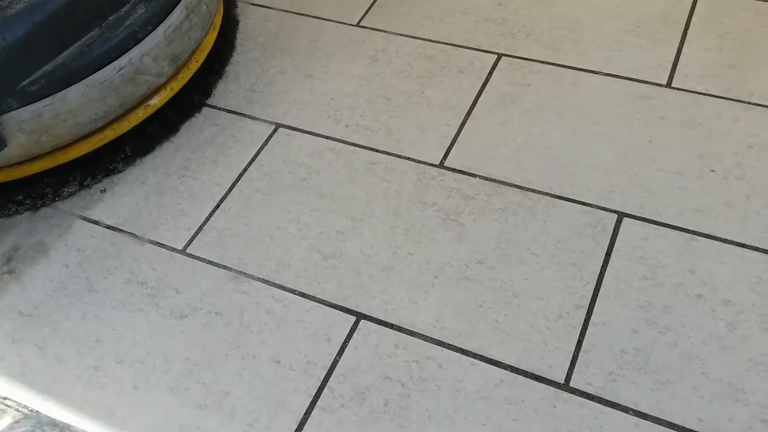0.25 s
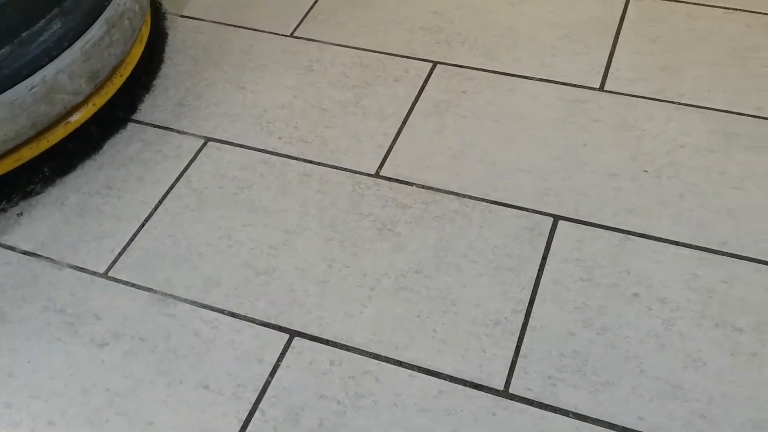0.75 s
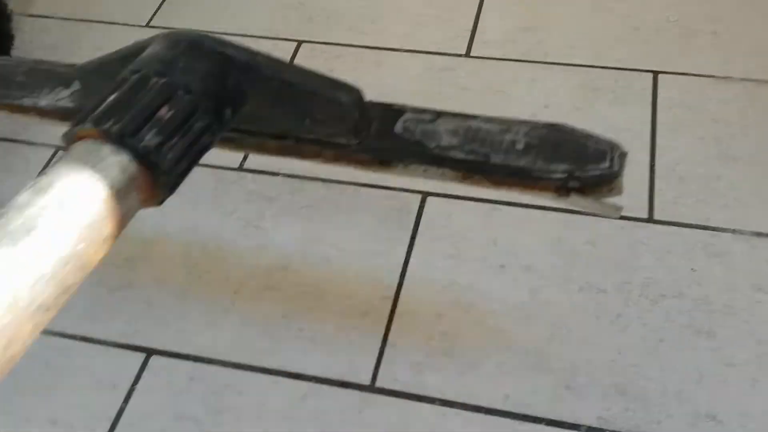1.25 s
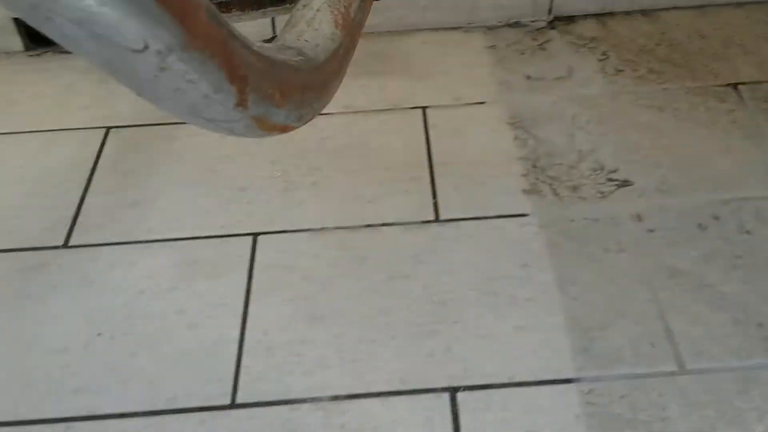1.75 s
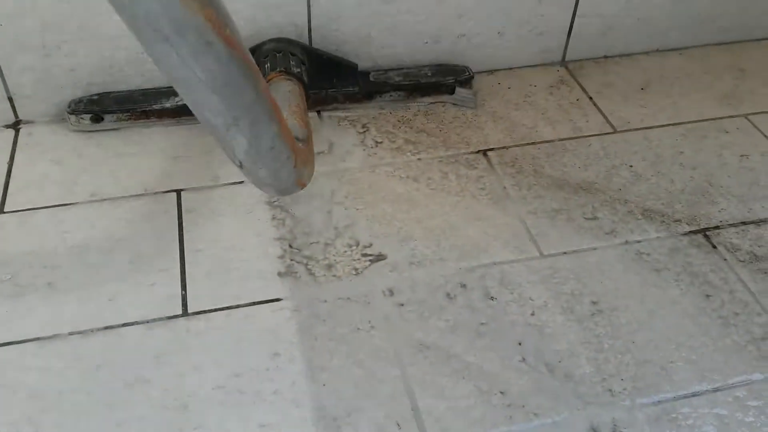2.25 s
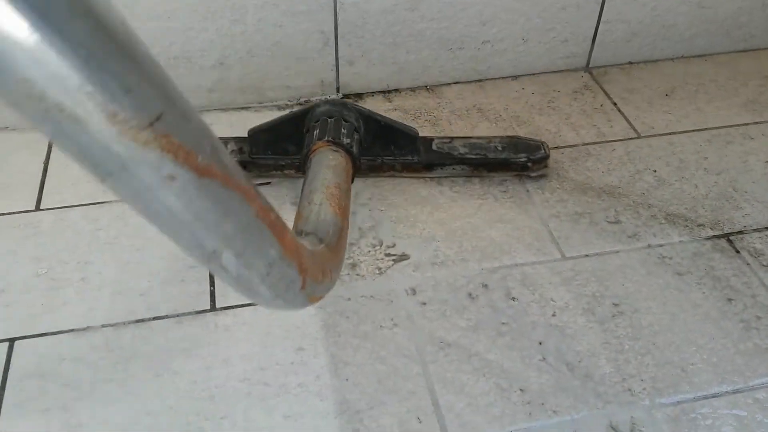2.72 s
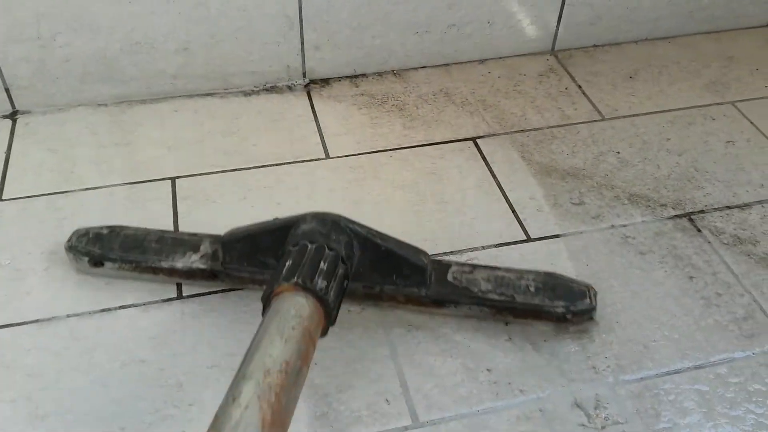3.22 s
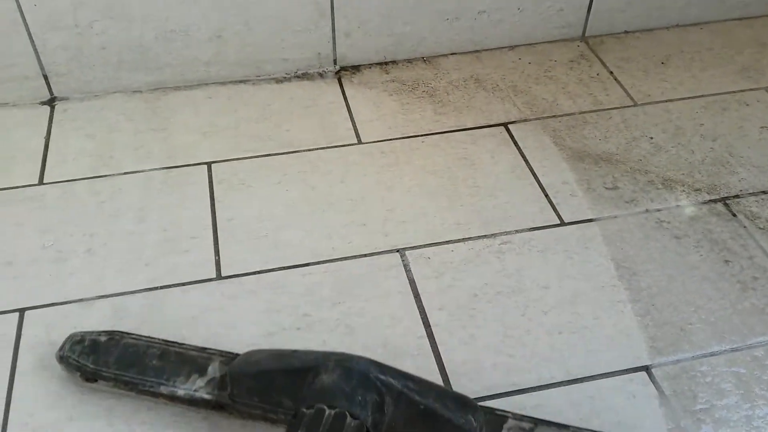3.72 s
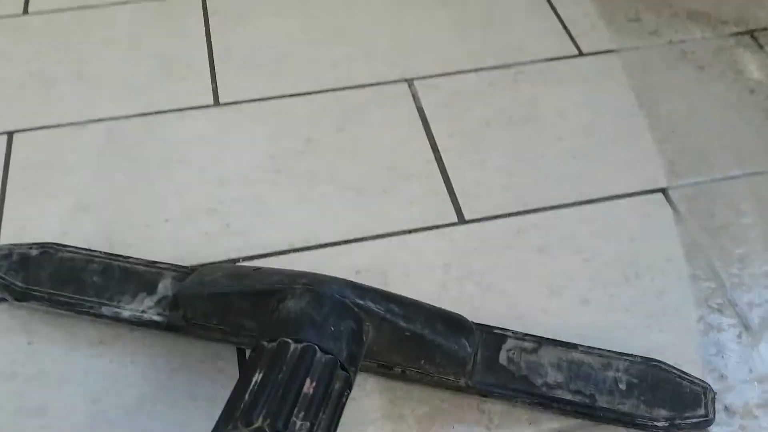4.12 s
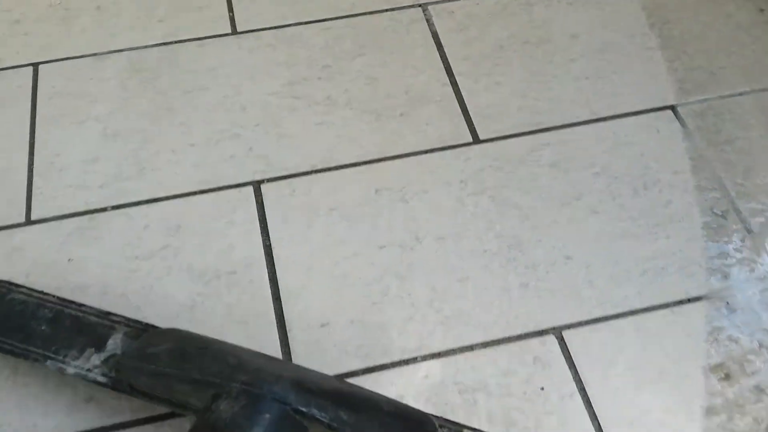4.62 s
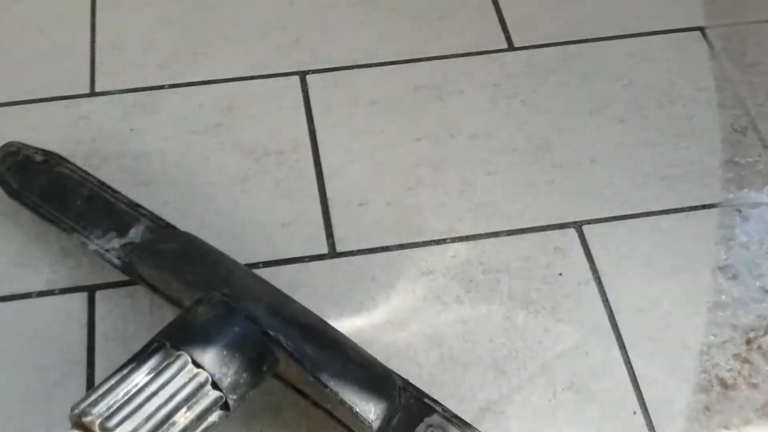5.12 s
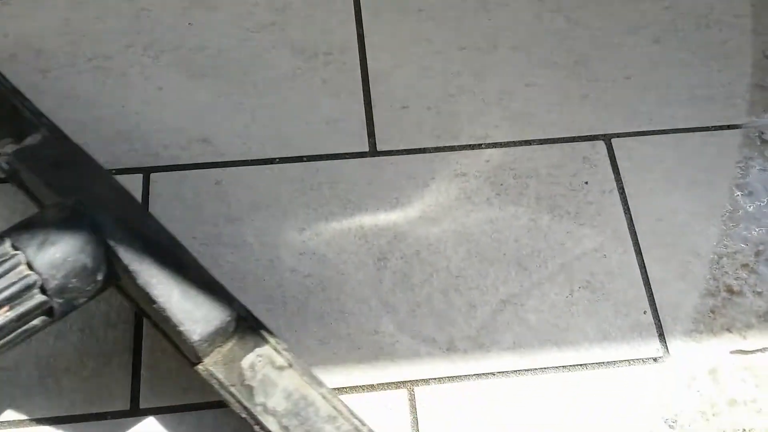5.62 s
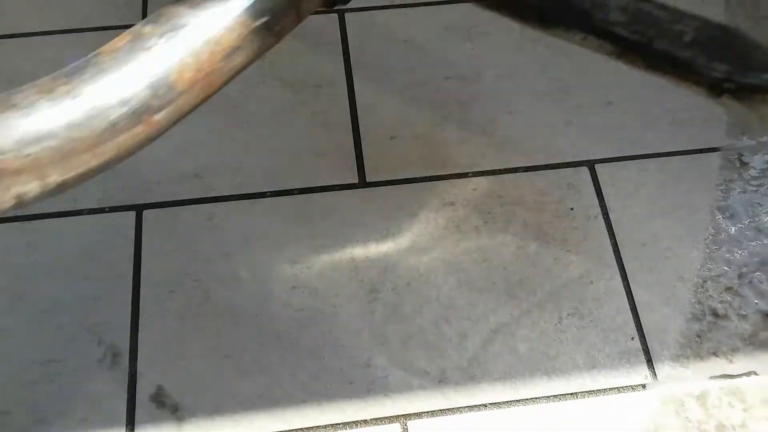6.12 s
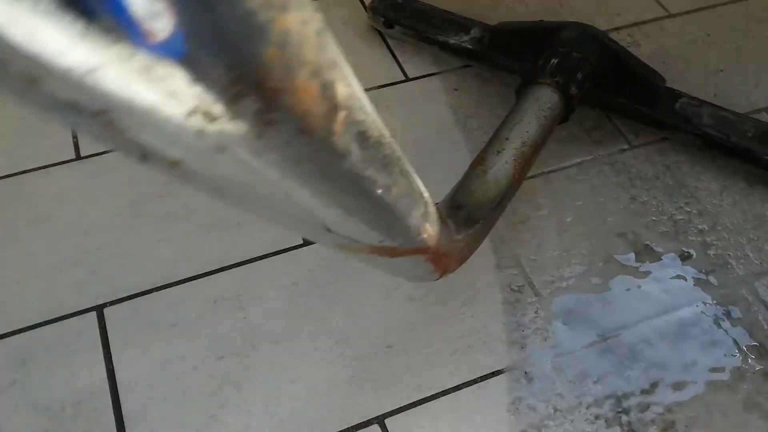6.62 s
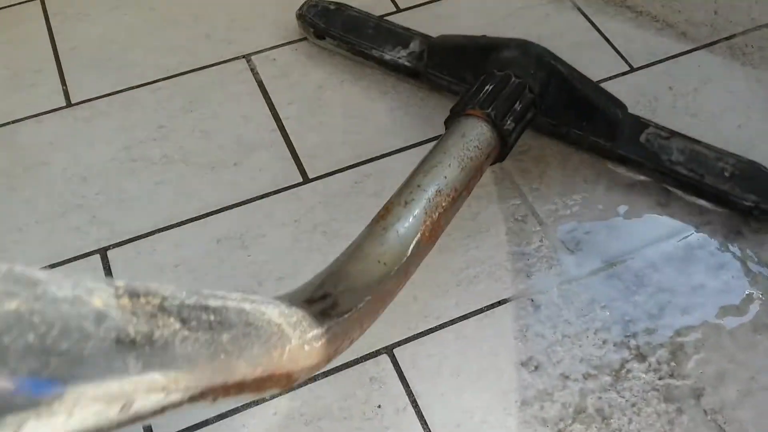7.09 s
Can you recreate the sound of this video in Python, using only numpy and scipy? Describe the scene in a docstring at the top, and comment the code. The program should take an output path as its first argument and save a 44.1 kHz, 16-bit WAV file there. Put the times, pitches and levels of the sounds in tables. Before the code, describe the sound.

A wet vacuum runs throughout in a tiled room, heard in stereo from a phone close to the wand. Its motor is a smooth, almost pure hum near 319 Hz with faint, wavering overtones, over hose roar, exhaust rush and slight low rumble. At the start there is a small puff, then bright suction hiss from the rubber lips, fading by 1 s as the nozzle lifts; the hum sags very slightly in pitch. A sharp tick at 1.9 s, a clack at 2.1 and a heavier hollow thump at 2.24 set the nozzle down, and hiss swells to 2.8 s. It continues with shifting brightness while the hum weakens sharply around 4 s, then gradually recovers. From 5.7 to 6 s the hiss falls away, leaving roar. Rapid clacks at 6.6 s and another knock at 6.7 bring the hiss back, continuing to the end at 7.35 s.

```python
"""The motor of a wet vacuum cleaner hums in a tiled room, heard by a phone held beside the wand.
The hum is a sine at the shaft speed, with quieter sines at multiples of it.
The squeegee nozzle knocks on the tiles, and hisses when its rubber lips seal on them.
Air roars in hose and exhaust over a low rumble: these and the hiss are noise built in narrow bands."""
import sys
import numpy as np
from scipy import signal
from scipy.fft import rfft, irfft, next_fast_len
from scipy.io import wavfile
from scipy.ndimage import uniform_filter1d

SR = 44100
rng = np.random.default_rng(int(sys.argv[2]) if len(sys.argv) > 2 else 0)


def store_wav(level_fs):
    """Save 16-bit WAV to argv[1]."""
    pcm = np.round(np.clip(np.atleast_2d(level_fs), -1, 1) * 32767)
    wavfile.write(sys.argv[1], SR, pcm.T.astype(np.int16))


N = 324135
T = np.arange(N) / SR  # time of each sample in seconds
SIZE = next_fast_len(N)
LOG_HZ = np.log2(np.arange(1, SIZE // 2 + 2) * SR / SIZE)  # pitch axis in octaves, for the spectra
SIDE = np.array([[1], [-1]])  # left, right

# Shaft speed; it sags while the nozzle is off the tiles and air flows freely.
# Each row: start in seconds, turns per second in Hz.
SHAFT_SPEED = [(0.0, 319.8), (1.0, 318.6), (1.8, 317.1), (2.3, 317.1), (2.9, 318.7), (3.7, 319.0),
               (4.4, 319.6), (5.3, 319.0), (5.9, 318.0), (6.55, 316.6), (7.35, 318.4)]


def motor():
    """The spinning shaft sounds once per turn and, more quietly, several times per turn."""
    speed_hz, = curves(SHAFT_SPEED)
    turn = 2 * np.pi * np.cumsum(speed_hz) / SR
    return np.sqrt(2) * (shaft_tone(turn) + overtones(turn))  # a sine's peak is root 2 times its rms


# Shaft tone as the phone moves through the room's standing waves.
# Each row: start in seconds, level in dB.
HUM_LEVEL = [(0.0, -15), (0.7, -12), (1.15, -12), (1.45, -12), (1.8, -15), (2.3, -15.5), (2.43, -17),
             (2.5, -15), (3.05, -16.5), (3.58, -14.7), (3.68, -15.6), (3.87, -20.3), (4.03, -28.5),
             (4.13, -25), (4.26, -19.5), (4.9, -19), (5.8, -16), (6.15, -17.5), (6.62, -20), (6.75, -22.5),
             (6.85, -18.5), (7.35, -19.5)]
# Which way the phone faces the machine.
# Each row: start in seconds, left minus right level in dB, left lead over right in radians.
PHONE_FACING = [(0.0, -3, .31), (1.3, -2.5, .28), (1.75, .5, .28), (2.2, 3, .15), (2.6, 2.2, .11),
                (3.7, 1.5, 0.094), (4.75, 2.5, .01), (5.95, 1, .07), (6.7, 2, -.14), (7.35, 2, -.2)]
# The hum flips over and drops for a moment: from seconds, to seconds, change in dB.
HUM_HICCUP = (3.606, 3.629, -5.5)


def shaft_tone(turn):
    """One sine per turn, with a level and phase difference between the two microphone ports."""
    level_db, = curves(HUM_LEVEL)
    pan_db, lead_rad = curves(PHONE_FACING)
    start, end, drop_db = HUM_HICCUP
    flip = np.where((T > start) & (T < end), -undb(drop_db), 1.0)
    flip = uniform_filter1d(flip, size=130)  # soften the edges
    gain = flip * undb(level_db + 0.31 * walk(16) + SIDE / 2 * pan_db)
    return gain * np.sin(turn + SIDE / 2 * lead_rad)


# Overtones swell and fade at each port as it moves.
# Each row: start in seconds, then left and right level in dB of the 2nd, the 6th and the 12th.
OVERTONE_LEVELS = [(0.0, -37, -35.5, -45, -45, -52, -50), (0.25, -33.5, -34, -30.5, -38, -46, -45),
                   (0.55, -33, -41, -38, -40, -45, -40), (0.9, -32, -40, -41, -33, -52, -40),
                   (1.25, -39, -38, -39, -29, -47, -36), (1.45, -56, -38, -33, -38, -45, -35),
                   (1.62, -30, -28, -35, -33, -45, -44), (1.9, -26.5, -30, -31, -30, -44, -46),
                   (2.15, -38, -59, -31.5, -38, -49, -42), (2.5, -44, -55, -33, -40, -50, -48),
                   (2.9, -46, -53, -41, -36, -46, -46), (3.35, -38.5, -44, -37, -47, -40, -46),
                   (3.9, -60, -56, -35, -43, -48, -46), (4.25, -52, -42, -42, -42, -52, -38.5),
                   (4.65, -45, -43, -35, -32, -46, -41), (5.15, -37, -34, -45, -40, -42, -45),
                   (5.55, -40, -41, -40, -30, -46, -48), (5.8, -35.5, -39, -36, -30, -49, -46),
                   (6.1, -33, -30, -42, -28.5, -42, -48), (6.45, -32, -46, -29, -28, -47, -42),
                   (6.67, -36, -52, -35, -40, -44, -39), (6.82, -37, -35, -36, -39, -47, -46),
                   (7.35, -39, -38, -42, -44, -44, -42)]
# Which multiples of the shaft speed those three pairs are.
OVERTONE_MULTIPLES = (2, 6, 12)
# Fainter overtones. Each row: multiple of the shaft speed, left level in dB, right level in dB.
FAINT_OVERTONES = [(3, -48, -42), (4, -45.5, -42), (5, -44.5, -41.5)]


def overtones(turn):
    """Sines at multiples of the shaft speed; shorter waves part more between the ports."""
    levels = curves(OVERTONE_LEVELS)
    part_rad = 1.5 * walk(2)  # slow drift of phase between the ports, as the 6th has it
    pairs = [(k, levels[2 * i:2 * i + 2]) for i, k in enumerate(OVERTONE_MULTIPLES)]
    pairs += [(k, faint_db) for k, *faint_db in FAINT_OVERTONES]
    out = np.zeros((2, N))
    for k, pair in pairs:
        short = (k - 2) / 4  # 0 for the 2nd, whose phase does not drift; 1 for the 6th
        for channel, level_db, half in zip(out, pair, (0.5, -0.5)):
            drift = short * (half * part_rad + 0.35 * walk(12))
            gain = undb(level_db + (0.6 + 1.1 * short) * walk(25))
            channel += gain * np.sin(k * turn + drift)
    return out


# Nozzle and wand knocks. Each row: start in seconds, thump level in dB,
# damping of the thump by hand and floor in 1/s, clack level in dB, tick level in dB.
KNOCK_EVENTS = [(1.941, -50, 0, -42, -13), (2.143, -40, 40, -10, -45), (2.239, -8.5, 2, -18, -20),
                (2.261, -15, 5, -33, -30), (6.593, -17, 40, -15, -40), (6.602, -16, 40, -10.5, -30),
                (6.612, -17, 40, -24, -45), (6.709, -22, 40, -20, -20)]
# Ringing of the wand and its air column.
# Each row: pitch in Hz, level in dB, time to fade by 60 dB in seconds before the extra damping.
WAND_MODES = [(60, -10, .12), (84.95, -8, 0.17), (127.3, -10, 0.79), (177, 3, 0.13), (207, -12, 0.09),
              (1110, -10.5, 0.35)]
# Ringing of the plastic nozzle, before each clack's random stretch.
# Each row: pitch in Hz, level in dB, time to fade by 60 dB in seconds.
NOZZLE_MODES = [(414, -1.5, 0.033), (543, -1, 0.056), (795, -0.5, 0.021), (1165, 0, 0.04), (1900, -5, .025),
                (3370, -5, 0.022)]


def knocks():
    """Each blow rings the wand and its air column, clacks the plastic nozzle and ticks on the tile."""
    out = np.zeros((2, N + SR))
    t = np.arange(SR // 2) / SR
    bright = signal.butter(3, 10000, "high", fs=SR, output="sos")
    thump = rings(WAND_MODES, t) * (1 - np.exp(-t / 0.0036))  # rubber lips soften the push
    for start, thump_db, damping, clack_db, tick_db in KNOCK_EVENTS:
        stretch = 1 + 0.094 * rng.standard_normal()  # each clack differs in pitch and decay
        clack = rings(NOZZLE_MODES, t * stretch) * (1 - np.exp(-t / 0.00044))
        burst = rng.standard_normal((2, len(t))) * np.exp(-t / 0.0012)
        tick = signal.sosfilt(bright, burst)
        blow = undb(thump_db) * thump * np.exp(-damping * t)
        blow = blow + undb(clack_db) * clack + undb(tick_db) * tick
        i = int(start * SR)
        out[:, i:i + len(t)] += blow
    return out[:, :N]


def rings(modes, t):
    """Decaying sines struck at time zero; neighbours swing opposite ways."""
    ring = [undb(db) * np.exp(-np.log(1000) * t / t60) * np.sin(2 * np.pi * hz * t) for hz, db, t60 in modes]
    return (sum(ring[::2]) - sum(ring[1::2])) / 2


# Suction through the gap under the rubber lips.
# Each row: start in seconds, hiss level in dB before tilt and puffs,
# left minus right level in dB, which all the air noise takes on in the treble.
LIP_SEAL = [(0.0, -23, 0), (0.16, -26.5, 1.5), (0.3, -25.2, 0), (0.6, -25.8, 0.5), (0.82, -28.5, 0.5),
            (0.95, -32.5, 0), (1.2, -33.4, .2), (2.236, -34.5, .6), (2.244, -29, 1.5), (2.45, -25, -0.5),
            (2.8, -20, -1.7), (3.15, -21.5, -.2), (3.5, -23.5, 0.5), (4.35, -21.8, 0), (5.55, -23, 0.8),
            (5.75, -26, .3), (6.0, -32.3, -0.5), (6.665, -33.5, 0), (6.69, -28, -1.3), (6.72, -24, -2),
            (6.97, -21, 1), (7.35, -22, 0)]
# Brightness of the hiss. Each row: start in seconds, tilt in dB per octave around 8000 Hz.
HISS_TILT = [(0.0, 2), (0.5, 2.2), (0.9, -1.5), (2.2, -3.5), (2.55, 0.3), (3.0, 1.1), (3.55, -1.5),
             (3.8, 0.5), (4.3, 1.5), (4.55, -2.2), (4.93, 3), (5.15, -1), (5.7, 2), (6.1, -1), (6.68, -3.5),
             (6.8, 2.2), (7.35, 1.5)]


def nozzle_hiss():
    """Air squeezing under the lips: level, tilt and left-right balance of the hiss over time."""
    level_db, pan_db = curves(LIP_SEAL)
    tilt_db, = curves(HISS_TILT)
    return level_db + puffs() + 0.7 * walk(28), tilt_db, pan_db


# Puffs of hiss as the lips slap the tiles.
# Each row: start in seconds, lift in dB, of which the peak reaches about three quarters.
LIP_PUFFS = [(0.09, 5.5), (2.243, 6), (6.597, 8.5), (6.7, 6)]


def puffs():
    """Each slap squeezes out air: a quick rise and fall of the hiss, in dB."""
    lift_db = np.zeros(N)
    for start, db in LIP_PUFFS:
        late = np.clip(T - start, 0, None)
        lift_db += 2 * db * (1 - np.exp(-late / 0.0051)) * np.exp(-late / 0.01)
    return lift_db


# Air in hose and exhaust.
# Each row: start in seconds, hose drone in dB, hose roar in dB, exhaust rush in dB.
AIR_LEVELS = [(0.0, -39, -29.5, -32), (0.45, -36, -25, -28), (0.85, -31.5, -25.5, -26.5),
              (1.0, -33, -23.5, -32.5), (1.6, -34.5, -24, -30), (2.15, -32.5, -23, -32.5),
              (2.4, -39, -25, -28), (2.6, -39, -27, -33.5), (3.05, -41, -29.5, -32.5),
              (3.35, -35, -27.5, -31), (3.75, -40.5, -28.5, -29), (4.05, -48, -27.5, -27),
              (4.35, -39, -27, -26), (4.55, -35.5, -24.5, -23), (4.85, -38.5, -26.5, -26),
              (5.4, -35, -24.5, -26), (5.7, -33, -24.5, -25.5), (6.0, -34, -23, -29.5),
              (6.6, -33.5, -22, -30), (6.75, -39, -23, -25), (6.95, -38, -25.5, -30.5),
              (7.35, -38, -25.5, -29)]
# Low noises through hand and drum.
# Each row: start in seconds, grip rumble in dB, drum boom in dB.
LOW_LEVELS = [(0.0, -60, -41), (0.6, -63, -36), (1.3, -54, -36), (2.1, -54, -35), (2.3, -47, -32),
              (2.6, -52, -40), (3.0, -61, -38), (3.35, -50, -41), (4.0, -56, -46.5), (4.4, -68, -51),
              (4.7, -59, -48), (5.8, -61, -45.5), (6.6, -54, -41), (7.35, -51, -49)]
# Colours of the noises, only the shape counts. Each row: pitch in Hz, power per Hz in dB.
HISS_COLOUR = [(2000, -26), (3200, 1), (4200, 0), (5500, 0.5), (7500, 0), (10000, -2), (12500, -4),
               (16000, -10.5)]
DRONE_COLOUR = [(230, -12), (330, -7.5), (480, 2), (600, 2), (740, -5), (950, -12)]
ROAR_COLOUR = [(560, -25), (720, -2.5), (850, -4.5), (1100, -0.5), (1500, -1), (2000, -6), (2400, -7),
               (2750, -29.5), (4000, -39)]
RUSH_COLOUR = [(1100, -20), (1600, -5.5), (2100, 0), (2700, -2), (3300, -5.5), (4200, -7.5), (5200, -23.5),
               (6500, -32)]
GRIP_COLOUR = [(25, -26), (40, -6), (55, -1), (80, -6.5), (120, -7)]
BOOM_COLOUR = [(60, -21), (90, -6.5), (130, -4.5), (200, 1), (280, 1), (400, -2)]
# How alike left and right are. Each row: pitch in Hz, left-right correlation from 0 to 1.
PORT_LIKENESS = [(30, .7), (130, 0.88), (290, 1), (600, 0.79), (900, 0.64), (1400, 0.07), (3000, 0.026)]


def airflow():
    """Turbulent air and low rumble share noise bands; each band flickers a little on its own."""
    hiss_db, tilt_db, pan_db = nozzle_hiss()
    colours = DRONE_COLOUR, ROAR_COLOUR, RUSH_COLOUR, GRIP_COLOUR, BOOM_COLOUR, HISS_COLOUR
    levels = curves(AIR_LEVELS) + curves(LOW_LEVELS) + [hiss_db]
    levels = [db - span_db(table) for table, db in zip(colours, levels)]
    like_hz, like_value = np.transpose(PORT_LIKENESS)
    out = np.zeros((2, N))
    step = 1 / 4  # octaves between bands
    for log_hz in np.arange(np.log2(25), np.log2(17000), step):
        tilted = levels[:-1] + [levels[-1] + tilt_db * (log_hz - np.log2(8000))]
        # every 64th sample is enough for the slow levels
        power = sum(undb(db[::64] + colour(table, log_hz)) ** 2 for table, db in zip(colours, tilted))
        treble = np.clip(log_hz - np.log2(2000), 0, 1)  # 0 below 2000 Hz, 1 above 4000 Hz
        swell_db = 0.8 - 0.4 * treble  # the treble swells less than the bass
        flicker_db = swell_db * walk(7) + 0.65 * walk(18)
        gain = np.interp(T, T[::64], np.sqrt(power)) * undb(flicker_db)
        like = np.clip(np.interp(log_hz, np.log2(like_hz), like_value), 0, 1)
        mid, apart = band_noise(log_hz, step)
        pair = np.sqrt((1 + like) / 2) * mid + np.sqrt((1 - like) / 2) * apart * SIDE
        out += gain * undb(treble * SIDE * pan_db / 2) * pair
    return out


def band_noise(log_hz, half):
    """Two unrelated noises in one raised-cosine band, unit power per Hz."""
    near = np.flatnonzero(np.abs(LOG_HZ - log_hz) < half)
    spectrum = np.zeros((2, len(LOG_HZ)), complex)
    real, imaginary = rng.standard_normal((2, 2, len(near)))
    shape = np.cos(np.pi / 2 * (LOG_HZ[near] - log_hz) / half)
    spectrum[:, near] = (real + 1j * imaginary) * shape
    return irfft(spectrum, SIZE)[:, :N] * np.sqrt(SIZE * SR / 4)


def span_db(table):
    """Total power of a colour in dB; taking it off makes layer levels rms."""
    return 10 * np.log10(np.sum(undb(colour(table, LOG_HZ)) ** 2) * SR / SIZE)


def colour(table, log_hz, column=1):
    """Read a spectrum in dB on a log-frequency axis; silent outside its ends."""
    rows = np.array(table, float)
    return np.interp(log_hz, np.log2(rows[:, 0]), rows[:, column], left=-90, right=-90)


def undb(db):
    """Turn dB into gain."""
    return 10 ** (np.asarray(db) / 20)


def curves(table):
    """Columns of a time table, joined by straight lines, one value a sample."""
    s, *columns = np.transpose(table)
    return [np.interp(T, s, c) for c in columns]


def walk(rate):
    """Random levels held 1 / rate seconds and smoothed twice; spread 1."""
    k = int(SR / rate)
    held = np.repeat(rng.standard_normal(N // k + 1), k)
    smooth = uniform_filter1d(uniform_filter1d(held, k), k)[:N]
    return smooth / smooth.std()


def scene():
    """All sources add up in the air at the phone."""
    return motor() + knocks() + airflow()


# The two microphone ports. Each row: pitch in Hz, left gain in dB, right gain in dB.
PORT_RESPONSE = [(59, 0.5, -1.5), (2520, 4.5, 1), (4200, 3, 3.5), (6430, -2.5, 2.5), (7350, 4.5, 6),
                 (7800, 6.5, 7.5), (8530, 12.5, -3), (9220, 6.5, -1), (10570, 0, -1.5), (12500, 4, -4),
                 (15100, 1.5, -5), (15250, -44, -45), (15800, -48, -53)]


def record(dry):
    """Each port has its own cavity resonance in the treble; the top is cut."""
    flat = np.clip(LOG_HZ, np.log2(PORT_RESPONSE[0][0]), np.log2(PORT_RESPONSE[-1][0]))  # level past the ends
    ports = undb([colour(PORT_RESPONSE, flat, column=1), colour(PORT_RESPONSE, flat, column=2)])
    heard = irfft(rfft(dry, SIZE) * ports, SIZE)[:, :N]
    top_cut = signal.ellip(8, 0.2, 70, 15757, fs=SR, output="sos")  # low-pass, edge in Hz
    return signal.sosfilt(top_cut, heard)


dry = scene()
out = record(dry)
store_wav(out)
```